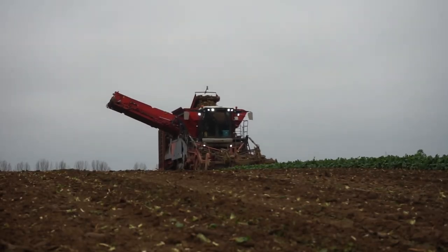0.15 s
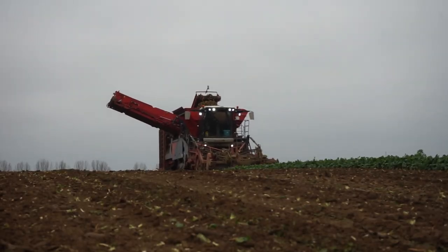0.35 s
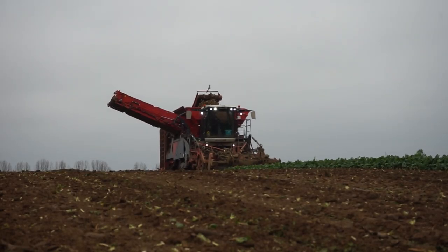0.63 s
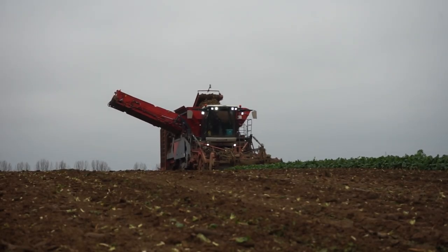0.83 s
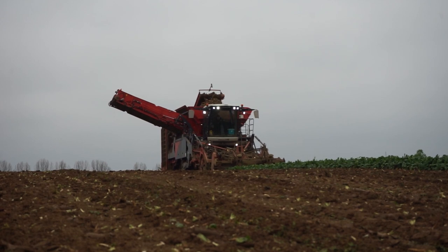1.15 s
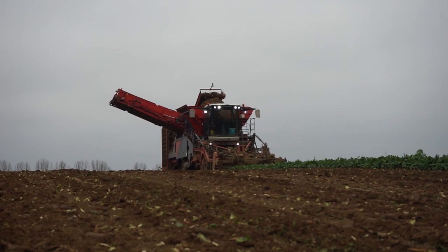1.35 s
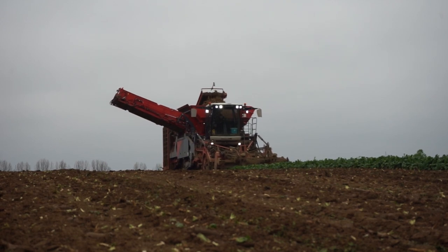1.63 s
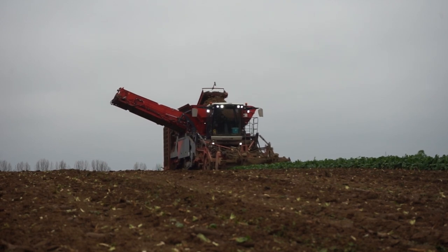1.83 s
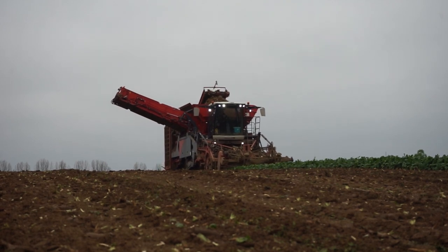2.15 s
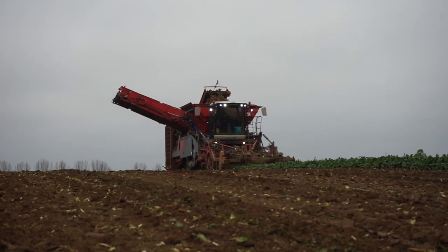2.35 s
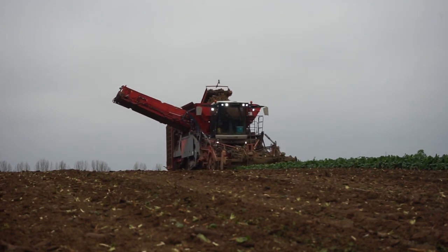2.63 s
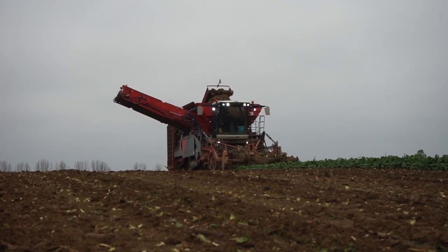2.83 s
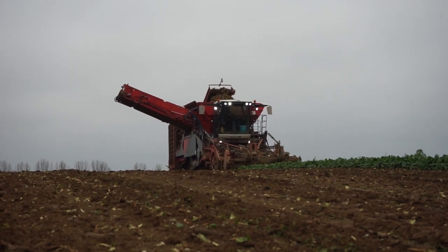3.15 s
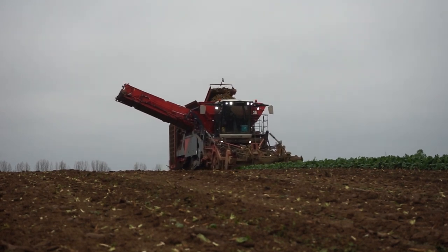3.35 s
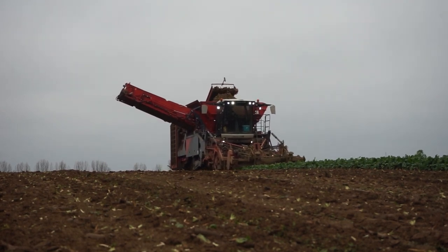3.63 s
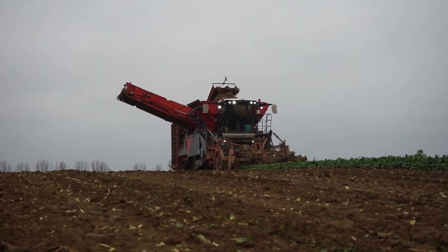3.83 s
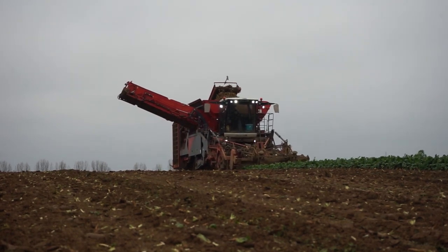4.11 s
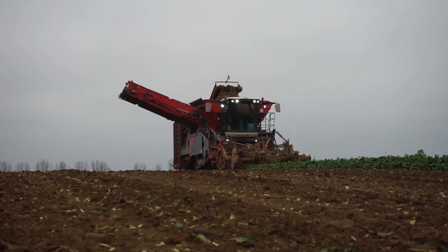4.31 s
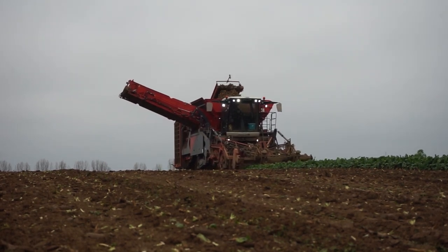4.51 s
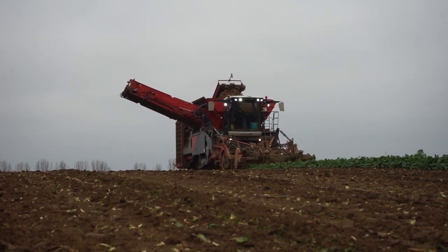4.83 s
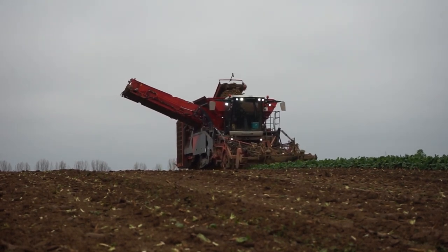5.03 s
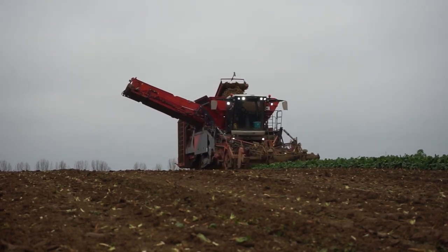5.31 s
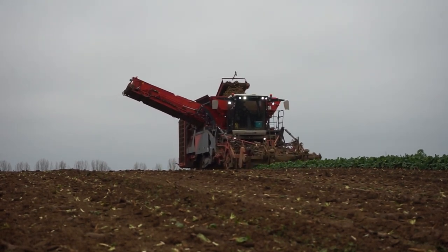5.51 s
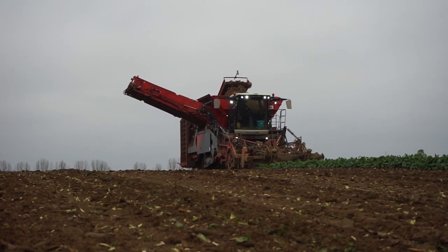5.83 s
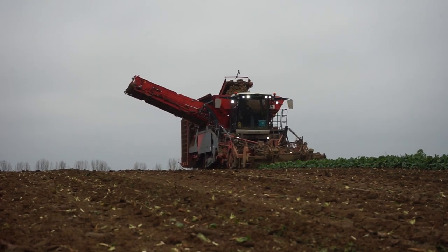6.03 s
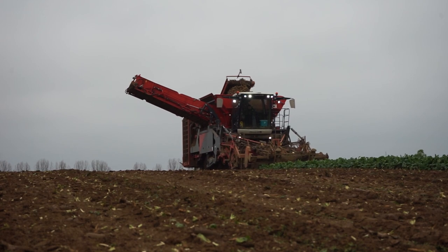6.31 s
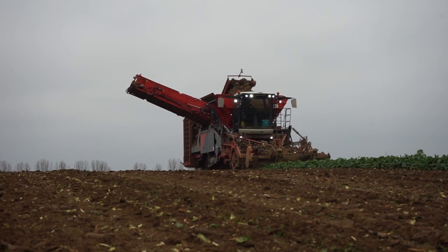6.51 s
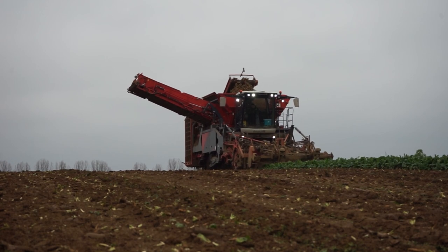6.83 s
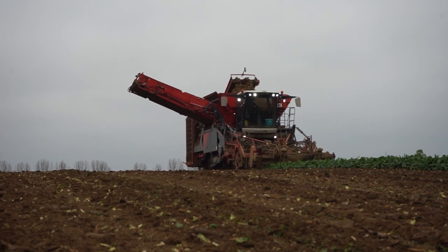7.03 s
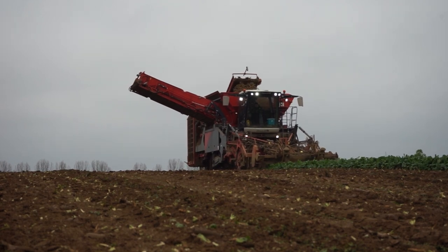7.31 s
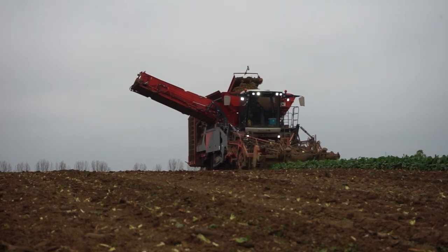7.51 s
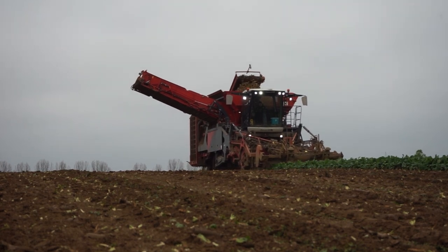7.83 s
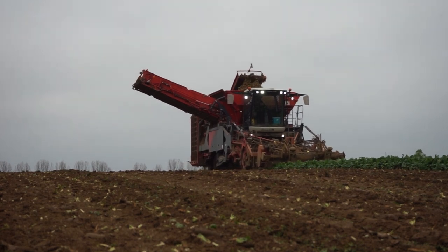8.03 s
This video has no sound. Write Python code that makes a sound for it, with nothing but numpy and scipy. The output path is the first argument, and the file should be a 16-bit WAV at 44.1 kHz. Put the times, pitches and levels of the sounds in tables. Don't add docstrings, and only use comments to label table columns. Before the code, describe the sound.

A large root harvester drones steadily across an open field, diesel throbbing with belt hiss and faint whine, while heavy wind buffets thump the microphone.

```python
import sys
import numpy as np
from scipy import signal
from scipy.fft import rfft, irfft
from scipy.io import wavfile
from scipy.ndimage import uniform_filter1d

SR = 44100
rng = np.random.default_rng(int(sys.argv[2]) if len(sys.argv) > 2 else 0)


def volts(x):
    e = np.asarray(x, float) / 20
    return 10 ** e


def wrap_up_sound(samples):
    columns = np.atleast_2d(samples).T
    tamed = np.clip(columns, -1, 1)
    steps = np.round(tamed * 32767).astype(np.int16)
    wavfile.write(sys.argv[1], SR, steps)


N = 359856

# (time [s], firing rate [Hz], exhaust effort [dB], body resonance on the 5th multiple [dB])
ENGINE = [(0, 45.53, -27, -44), (.3, 45.56, -24.5, -28), (.7, 45.3, -24.5, -29), (1, 45.4, -22.5, -35),
          (1.15, 45.06, -19, -34), (1.42, 45.52, -24, -35), (1.58, 45.3, -27.5, -29),
          (1.8, 45.2, -25.5, -29.5), (2.1, 45.26, -20.5, -28), (2.6, 45.2, -28, -39),
          (2.95, 45.3, -27, -25), (3.3, 45, -29.5, -32.5), (3.9, 45.15, -25, -28), (4.7, 45.23, -28, -32.5),
          (5.4, 45.25, -23.5, -27), (6.3, 45.56, -28.5, -33.5), (7.2, 45.43, -23, -32.5),
          (8.16, 45.13, -27, -30.5)]
# (multiple of the firing rate [-], level [dB])
EXHAUST_ORDERS = [(1, -33), (2, -22), (3, -13.5), (4, -40), (6, 1), (7, -9.5), (8, -12), (12, -23.5),
                  (18, -39)]
# (time [s], level [dB])
SOIL_SURGES = [(.29, 2), (.41, -1.5), (.64, 4.5), (.79, 3.5), (.85, -1.5), (1.09, 0.5), (1.2, -3),
               (1.41, 3), (1.5, 0), (1.68, 1), (1.76, -1.5), (2.05, 0), (2.18, -1.5), (2.3, -1.5),
               (2.45, 2), (2.6, 3.5), (2.78, 2), (3.02, 3.5), (3.15, 2), (3.27, -0.5), (3.5, 2),
               (3.87, -0.5), (4.22, -1), (4.42, -3), (5.0, 1), (5.07, -3.5), (5.37, 2), (5.92, -1.5),
               (6.11, 2), (6.35, -1), (6.43, 2), (6.78, 4), (7.2, 1), (7.5, -4), (7.62, -1), (7.76, 5),
               (7.95, 1.5)]
# (frequency [Hz], level [dB per Hz])
ROAR_COLOUR = [(29, -28), (50, -9), (95, -8), (173, -5), (215, -3), (300, -3), (400, -4.5), (480, -8),
               (545, -10.5), (595, -19.5), (660, -28), (800, -36), (1040, -57), (1760, -120)]
# (time [s], piston rate [Hz], pump load [dB], clearness of the whine through the air [dB])
PUMP = [(0, 316, -69, -2), (.7, 315, -57, 4), (1.2, 312.8, -49, -3), (1.9, 313.4, -47, 0.5),
        (2.7, 314.7, -43.5, -4), (2.95, 313.4, -43, 5), (3.6, 318.8, -42, 0), (4.35, 312.6, -54, 3),
        (4.65, 312.8, -42.5, -0.5), (5.1, 315, -57, 4.5), (5.7, 314.3, -63, 3.5), (6.8, 314, -43.5, 3.5),
        (7.5, 312.6, -46, 1.5), (8.16, 312.5, -43, 6)]
# (multiple of the piston rate [-], level [dB])
WHINE_ORDERS = [(3, -2), (4, -3), (5, -3), (6, 0.5), (7, -3.5), (8, -9)]
# (frequency [Hz], level [dB])
DRIVE_SHAFTS = [(75, -43), (124.5, -38.5), (251, -39.5), (352, -50.5), (817, -65.5)]
# (time [s], level [dB], clearness [dB])
AIR_PATH = [(0, -37.5, -9.5), (.4, -39, -4.5), (.65, -37.5, -7.5), (.9, -39.5, -9), (1.35, -41, -7),
            (1.55, -41.5, -6.5), (2.1, -41, -9.5), (2.75, -43, -10.5), (3.15, -41, -10), (3.35, -41, -11),
            (3.65, -38.5, -7), (4, -42.5, -8), (4.75, -43.5, -7.5), (5.25, -37.5, -8.5), (6.6, -38, -8.5),
            (7.25, -35.5, -9), (7.6, -39, -5.5), (8.16, -36.5, -6.5)]
# (frequency [Hz], level [dB per Hz])
HISS_COLOUR = [(380, -33.5), (650, -6.5), (748, -4.5), (1270, -5), (1610, -7.5), (1700, -9.5), (1920, -7.5),
               (1980, -9), (3450, -11), (5920, -20.5), (8040, -17), (9700, -30), (10800, -33), (14000, -52),
               (22000, -120)]
# (time [s], frequency [Hz], depth [dB])
GROUND_DIP = [(0, 984, 4), (.7, 1230, 2.5), (1.5, 2000, 1.5), (2.4, 2320, 2), (2.8, 2550, 6.5),
              (3.2, 3030, -1), (3.45, 1170, 7), (4.5, 1700, 1.5), (4.9, 1100, -0.5), (5.5, 1190, 1.5),
              (6.8, 960, 4), (8.16, 1380, 1.5)]
# (time [s], level [dB], half length [s])
SIEVE_SOIL = [(0.107, 5.5, 0.1), (.4, -3, 0.052), (1, 6, 0.11), (1.155, 3, 0.05), (1.517, -1, .05),
              (2.4, 4.5, 0.044), (2.657, 3.5, .06), (2.878, -4, .07), (3.56, 3.5, .03), (3.76, 3.5, 0.069),
              (4.055, 1, 0.027), (4.254, 3.5, 0.075), (4.325, 2.5, .025), (4.43, 3, 0.024),
              (4.503, -2, 0.023), (4.603, 1.5, 0.077), (4.8, 1, .07), (5.023, 1, 0.063),
              (5.197, 1.5, 0.071), (5.754, 0.5, 0.049), (6.083, 4, 0.14), (6.498, -1.5, 0.049),
              (6.597, 5, 0.11), (6.836, 1, 0.056), (7.01, -1.5, 0.04), (7.246, 7.5, 0.096),
              (7.532, 3, 0.039), (7.805, 1, 0.057), (8.13, -2, .03)]
# (time [s], level [dB], half length [s])
HISS_SWELLS = [(0.653, 0.5, 0.071), (0.902, 0, 0.085), (1.336, 3, 0.061), (1.65, -3, 0.063), (1.78, 1, 0.025),
               (1.95, -3, 0.047), (2.245, -1.5, 0.025), (2.305, -2, 0.016), (2.47, 1, 0.037), (2.8, 0.5, 0.15),
               (3.264, -2.5, 0.014), (3.35, 0, 0.036), (3.75, 0, 0.042), (4.167, 1, .05), (4.4, 2.5, 0.067),
               (4.642, -3, 0.018), (4.7, 1, .03), (4.92, -3.5, 0.03), (5.07, 0, .03), (5.3, -0.5, 0.09),
               (5.685, 1.5, 0.16), (5.86, -1.5, 0.068), (6.05, -1, 0.054), (6.69, 0, 0.077), (7.002, -2, 0.14),
               (7.34, 0.5, .05), (7.65, -0.5, .06), (7.842, 2, 0.056), (7.95, -0.5, .04), (8.045, 2, 0.032)]
# (frequency [Hz], level [dB per Hz])
CAPSULE_COLOUR = [(5000, -30), (8500, -3), (9600, -6), (11000, 3), (14000, -29)]
# (time [s], level [dB])
STEADY_WIND = [(0, -20), (.5, -25), (.8, -22), (1.9, -22), (2.3, -16.5), (2.9, -13.5), (3.4, -12.5),
               (3.8, -20.5), (4.5, -14), (4.9, -25), (5.5, -17.5), (6.3, -20.5), (7.2, -19), (8.16, -25)]
# (frequency [Hz], level [dB per Hz])
RUMBLE_COLOUR = [(2, -35), (4, 3), (16, 0), (24, 0), (34, -10), (55, -12.5), (90, -26), (120, -42),
                 (200, -120)]
# (time [s], level [dB])
FLURRIES = [(.26, 2), (.46, -4), (.91, -4), (1.32, -4), (1.81, -4), (2.16, 0), (2.9, -7), (3.2, 1.5),
            (3.48, -6), (3.72, 9), (4.28, -5.5), (5.1, 6), (6.06, 6.5), (6.86, -12), (7.11, 5), (7.48, 3)]
# (time [s], frequency [Hz], level [dB])
MOAN = [(0, 156.6, -29.5), (.3, 129.7, -31.5), (1.2, 149, -50), (2, 124.3, -40.5), (2.4, 151.5, -24.5),
        (2.65, 166, -24.5), (3.1, 154.6, -25.5), (3.4, 169, -25.5), (3.9, 162.5, -28), (4.2, 159.4, -27),
        (4.6, 149.4, -30.5), (4.95, 137, -27.5), (5.8, 122.5, -45), (6.4, 150.3, -24.5),
        (6.8, 124.5, -29.5), (7.15, 139.8, -28), (7.7, 143, -29.5), (8.16, 144, -31)]
# (time of deepest swing [s], strength [dB], half length [s],
# swing rate [Hz]: + pushes the diaphragm in, - pulls it out)
GUSTS = [(0.693, -10.2, 0.057, -10.6), (0.759, -13.2, 0.03, 12.3), (0.835, -6.6, 0.056, -16.7),
         (0.948, -11, 0.04, 13), (1.344, -13.6, 0.039, 14.4), (1.852, -8.7, 0.09, -10.7),
         (1.957, -12.4, 0.03, -15.6), (2.063, -12.8, 0.03, 16.7), (2.163, -6.1, 0.033, -19.1),
         (2.279, -1.2, 0.03, 17.3), (2.375, -5.4, 0.03, 14.4), (2.617, -5.9, 0.03, 21.5),
         (2.704, -4.0, 0.03, 14.6), (2.891, -9.0, 0.039, -16.2), (3.03, -7.4, 0.038, -15.0),
         (3.164, -6.1, 0.03, 17.3), (3.244, -2.5, 0.032, 23), (3.277, -2.5, 0.026, -19),
         (3.407, -10.7, 0.033, 23.9), (3.523, -1.7, 0.055, 24.0), (3.656, -8.0, 0.03, -17.8),
         (3.86, -4.7, 0.03, 19.7), (3.969, -8.5, 0.03, -21.2), (4.095, -5.7, 0.03, 25.7),
         (4.219, -5.4, 0.036, 21.6), (4.358, -12.1, 0.03, 18.2), (4.48, -5.1, 0.03, -17.7),
         (4.553, -3.4, 0.024, 18.0), (4.579, -5, 0.018, -20), (4.794, -8.5, 0.031, -16.7),
         (5.157, -12.4, 0.049, -14.2), (5.311, -13.7, 0.046, 22.3), (5.439, -11.3, 0.03, -18.2),
         (5.567, -10.1, 0.03, -15.3), (5.647, -3.1, 0.03, 20.8), (5.803, -9.0, 0.03, 15.1),
         (6.076, -14.6, 0.03, -13.3), (6.218, -9.5, 0.03, -16.7), (6.376, -10.2, 0.03, -15.4),
         (6.454, -7.5, 0.052, -17.9), (6.538, -10.7, 0.03, -19.1), (6.741, -14.4, 0.03, 27.9),
         (6.819, -6.8, 0.03, -15.5), (6.956, -11.9, 0.03, -14.2), (7.034, -10.4, 0.041, 16.3),
         (7.327, -7, 0.026, 14.0), (7.372, -8.5, 0.03, -15), (7.566, -14.1, 0.03, 18.0),
         (7.906, -11.2, 0.053, -14.6), (8.031, -12.3, 0.03, 18.9)]

GEAR_RATIO = 13.54
SURGE_HALF_S, SURGE_HISS_SHARE = 0.047, 0.28
ROAR_DB, ROAR_SAG_DB_PER_S, ROAR_EFFORT_SHARE = -20, 0.19, 0.22
WHINE_DB, WHINE_AIR_SHARE = -57.3, 0.51
CAPSULE_DB, FLURRY_HALF_S = -69.5, 0.092
DUCK_FROM_DB, DUCK_SHARE, DUCK_LAG_S = -4, 0.57, 0.012


def evened(x):
    return x / np.sqrt(np.mean(x ** 2) + 1e-20)


def read(points, hz):
    f, value = np.transpose(points)
    return np.interp(np.log(hz + 1), np.log(f + 1), value)


def curves(rows, t):
    s, *columns = np.transpose(rows)
    return [np.interp(t, s, c) for c in columns]


def bumps(t, s, height, half_s):
    coarse = t[::64]
    shapes = np.exp(-((coarse - np.c_[s]) / np.c_[half_s]) ** 2)
    return np.interp(t, coarse, height @ shapes)


def drift(top_hz, above_hz=0.):
    hz = np.fft.rfftfreq(N, 1 / SR)
    band = hz ** 2 / (hz ** 2 + above_hz ** 2 + 1e-9) / np.sqrt(hz + 1) / (1 + (hz / top_hz) ** 4)
    return evened(irfft(rfft(rng.standard_normal(N)) * band, N))


def noise(shape_db, patchy_db, size):
    hop = size // 4
    frames, hz = N // hop + 5, np.fft.rfftfreq(size, 1 / SR)
    a, b, patches = rng.standard_normal((frames, len(hz), 3)).T
    patches = uniform_filter1d(patches, size=size // 64, axis=0)
    patches = evened(uniform_filter1d(patches, size=16384 // size, axis=1))
    times = np.arange(frames) * hop / SR
    z = (a + 1j * b) * volts(shape_db(hz[:, None], times) + patchy_db * patches)
    return evened(signal.istft(z, nperseg=size, noverlap=size - hop)[1][:N])


def stack(rate_hz, orders, flutter_db, blur, scatter=1):
    turns = np.cumsum(rate_hz) / SR
    total = np.zeros(N)
    for multiple, db in orders:
        level = np.sqrt(2) * volts(db + flutter_db * drift(16.0, 1.0))
        phase = multiple * turns + scatter * rng.random() + blur * drift(14.0)
        total += level * np.sin(2 * np.pi * phase)
    return total


def surge(t):
    s, db = np.transpose(SOIL_SURGES)
    return bumps(t, s, db, [SURGE_HALF_S])


def engine(t):
    rate_hz, effort_db, fifth_db = curves(ENGINE, t)
    firings = np.cumsum(rate_hz) / SR
    surge_db = surge(t)
    top_db = 0.92 * drift(14, 1.6)

    def colour(hz, s):
        tilt = np.clip(np.log2((hz + 1) / 290), -.5, .5)
        return read(ROAR_COLOUR, hz) + 0.4 * tilt * np.interp(s, t, top_db)

    throb = 1 + 0.12 * np.cos(2 * np.pi * firings)
    roar = noise(colour, patchy_db=0.8, size=2048) * throb
    roar_db = ROAR_DB - ROAR_SAG_DB_PER_S * t + ROAR_EFFORT_SHARE * (effort_db - effort_db.mean())
    roar_db = roar_db + surge_db + drift(22, 5.6)
    gear = stack(GEAR_RATIO * rate_hz, [(1, -48.0)], flutter_db=3.8, blur=0.045)
    fifth = volts(fifth_db) * stack(rate_hz, [(5, 1.4)], flutter_db=1.5, blur=0.025, scatter=0)
    exhaust = stack(rate_hz, EXHAUST_ORDERS, flutter_db=3.0, blur=0.07, scatter=0)
    exhaust = volts(effort_db + surge_db - 0.5) * exhaust
    return exhaust + fifth + gear + volts(roar_db) * roar, firings


def hydraulics(t):
    rate_hz, load_db, clearness_db = curves(PUMP, t)
    carry_db = curves(AIR_PATH, t)[0]
    hums = np.zeros(N)
    for hz, db in DRIVE_SHAFTS:
        hums += stack(hz * (1 + 0.002 * drift(1.6)), [(1, db)], flutter_db=3.1, blur=0.073)
    second = volts(load_db) * stack(rate_hz, [(2, 0.003)], flutter_db=1.7, blur=0.15)
    whine_db = WHINE_DB + WHINE_AIR_SHARE * (carry_db - carry_db.mean()) + clearness_db
    whine = volts(whine_db) * stack(rate_hz, WHINE_ORDERS, flutter_db=2.7, blur=0.066)
    return whine + second + hums


def fan_and_belts(t, firings):
    shimmer_db = bumps(t, *np.transpose(SIEVE_SOIL)) + 0.27 * drift(21, 7.0)

    def colour(hz, s):
        treble_db = curves(AIR_PATH, s)[1] + np.interp(s, t, shimmer_db)
        dip_hz, depth_db = curves(GROUND_DIP, s)
        dip = depth_db * np.exp(-(np.log2((hz + 1) / dip_hz) / 0.8) ** 2)
        treble = np.clip(np.log2((hz + 1) / 3300), 0, 1)
        return read(HISS_COLOUR, hz) - dip + treble * (treble_db - treble_db.mean())

    hiss = noise(colour, patchy_db=0.97, size=512)
    knock = 1 + 0.068 * np.cos(2 * np.pi * firings) + 0.05 * np.cos(4 * np.pi * firings)
    ticks = (rng.random(N) < 90 / SR) * np.minimum(rng.exponential(1, N), 1.8)
    ring = np.exp(-np.arange(600) / SR / 0.0018)
    rattle = 1 + 0.58 * signal.oaconvolve(ticks, ring)[:N]
    top = signal.sosfilt(signal.butter(2, 1900, "high", fs=SR, output="sos"), hiss)
    links = signal.sosfilt(signal.butter(4, 5600, "low", fs=SR, output="sos"), top)
    grit = top - links
    shaking = links * evened(knock * rattle) + grit * evened(knock * np.roll(rattle, shift=N // 3))
    shaken = hiss - top + shaking * volts(drift(9.7))
    level_db = curves(AIR_PATH, t)[0] + SURGE_HISS_SHARE * surge(t) + bumps(t, *np.transpose(HISS_SWELLS))
    return volts(level_db + 1.48 + 0.26 * drift(22, 14.0) + 0.7 * drift(47)) * shaken


def capsule_hiss():
    return volts(CAPSULE_DB) * noise(lambda hz, s: read(CAPSULE_COLOUR, hz) + 0 * s, patchy_db=1.5, size=512)


def rumble(t):
    hz = np.fft.rfftfreq(N, 1 / SR)
    swing = irfft(rfft(rng.standard_normal(N)) * volts(read(RUMBLE_COLOUR, hz)), N)
    steady = evened(swing / np.sqrt(abs(uniform_filter1d(swing ** 2, size=4500)) + 1e-12))
    wind_db = curves(STEADY_WIND, t)[0] + 1.3 * drift(16, 4.)
    gust_db = 10 * np.log10(volts(wind_db) ** 2 + volts(gusts(t) - 10.0) ** 2)
    deep = uniform_filter1d(uniform_filter1d(steady, size=1000), size=1000)
    bright_db = 0.38 * (uniform_filter1d(gust_db, size=30000) + 16.5)
    bright_db = bright_db + bumps(t, *np.transpose(FLURRIES), [FLURRY_HALF_S])
    return volts(gust_db) * (deep + volts(bright_db) * (steady - deep))


def moan(t):
    moan_hz, moan_db = curves(MOAN, t)
    turn = np.exp(2j * np.pi * np.cumsum(moan_hz * (1 + .03 * drift(6))) / SR)
    r = np.exp(-np.pi * 13. / SR)
    tone = turn * signal.lfilter([1], np.convolve([1, -r], [1, -r]), rng.standard_normal(N) / turn)
    tone = (tone / abs(tone) ** .3).real
    return volts(moan_db) * evened(tone)


def gusts(t):
    s, db, half_s, _ = np.transpose(GUSTS)
    return 10 * np.log10(bumps(t, s, volts(db) ** 2, half_s) + 1e-8)


def buffets(t):
    coarse = t[::16]
    s, db, half_s, hz = np.transpose(GUSTS)[:, :, None]
    envelope = np.sign(hz) * volts(db) * np.exp(-((coarse - s) / half_s) ** 2)
    swings = envelope * np.cos(2 * np.pi * hz * (coarse - s))
    return np.interp(t, coarse, swings.sum(axis=0))


def buffet_duck(t):
    return volts(-DUCK_SHARE * np.maximum(gusts(t - DUCK_LAG_S) - DUCK_FROM_DB, 0))


def scene():
    t = np.arange(N) / SR
    drone, firings = engine(t)
    machine = drone + hydraulics(t) + fan_and_belts(t, firings)
    wind = rumble(t) + moan(t) + buffets(t)
    return (buffet_duck(t) * machine + wind + capsule_hiss())[None]


def low_pass(x):
    return signal.sosfilt(signal.butter(12, 10995, fs=SR, output="sos"), x)


def record(dry):
    dry = signal.sosfiltfilt(signal.butter(2, 5, "high", fs=SR, output="sos"), dry)
    peak_db = 20 * np.log10(abs(dry[0]) + 1e-6)
    fall = np.arange(N) * 200.0 / SR
    held_db = np.maximum.accumulate(peak_db + fall) - fall
    over_db = np.maximum(held_db + 3.5, 0)
    limited = dry * volts(-0.28 - 0.15 * uniform_filter1d(over_db, size=200))
    rounded = limited / (1 + limited ** 24) ** (1 / 24)
    return low_pass(rounded)


dry = scene()
out = record(dry)
wrap_up_sound(out)
```